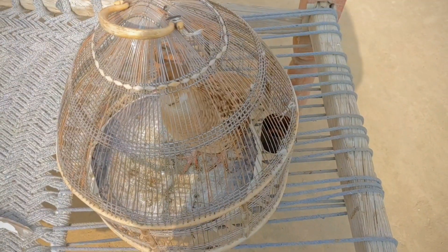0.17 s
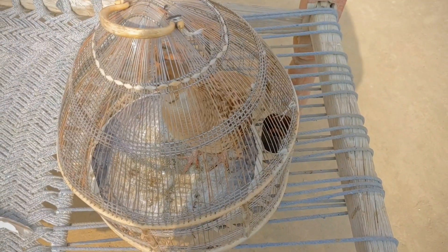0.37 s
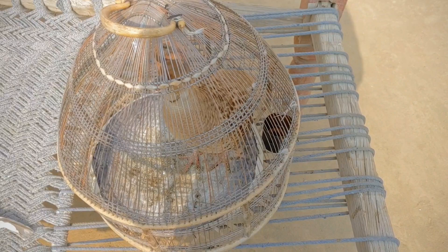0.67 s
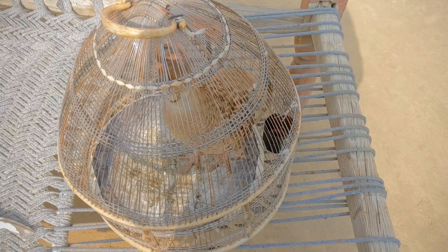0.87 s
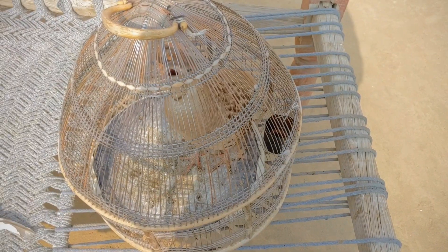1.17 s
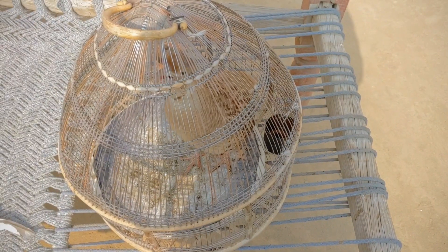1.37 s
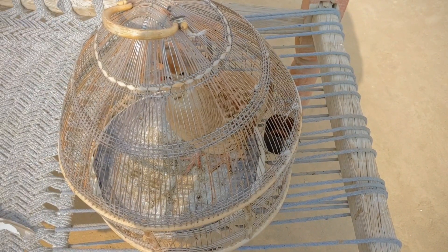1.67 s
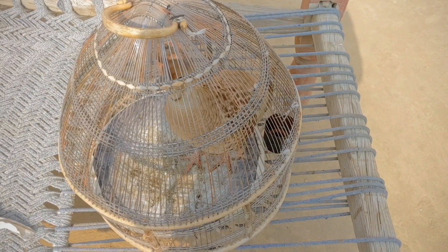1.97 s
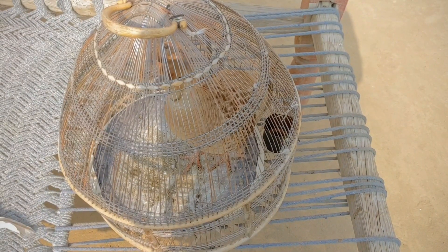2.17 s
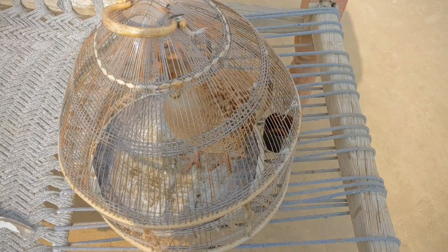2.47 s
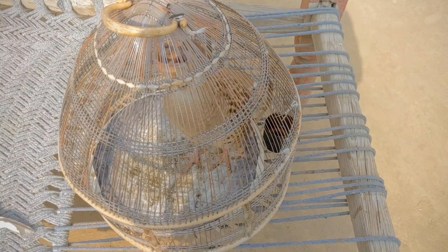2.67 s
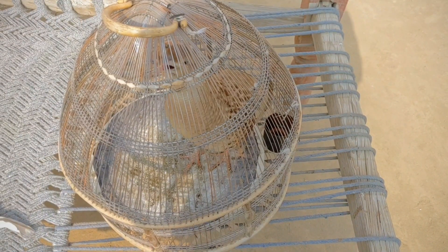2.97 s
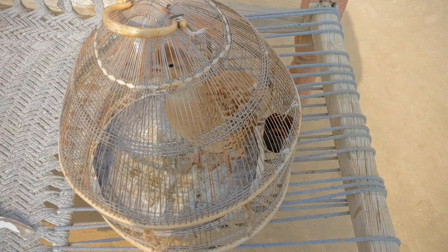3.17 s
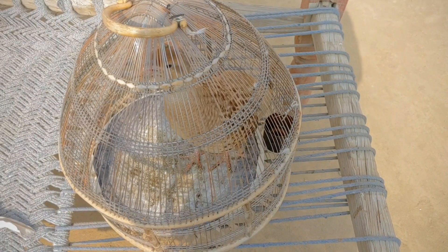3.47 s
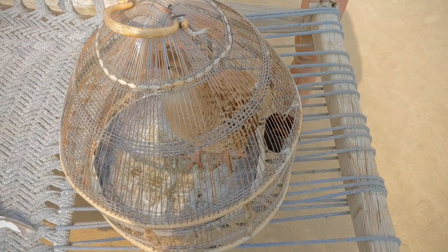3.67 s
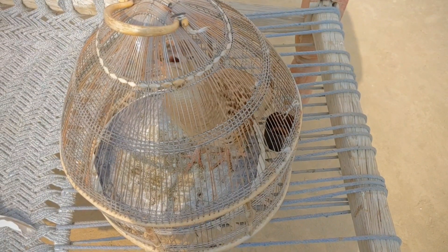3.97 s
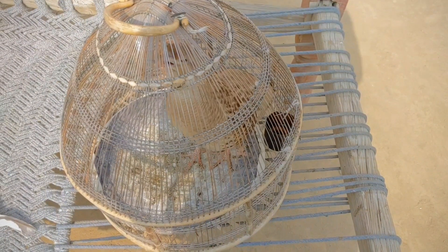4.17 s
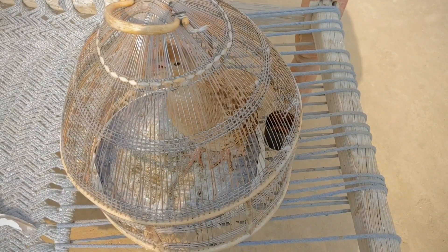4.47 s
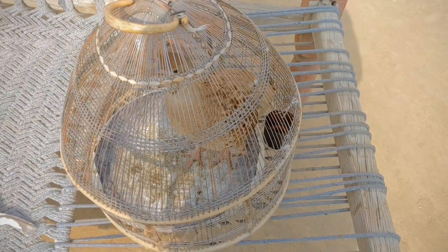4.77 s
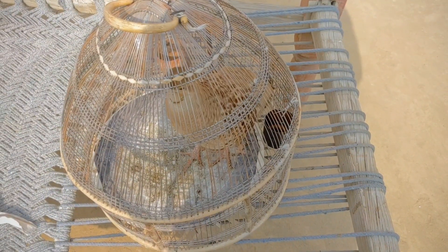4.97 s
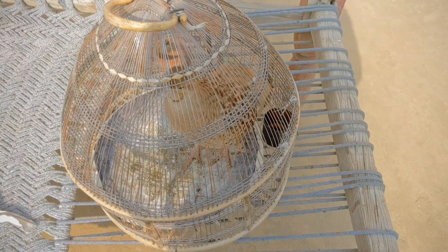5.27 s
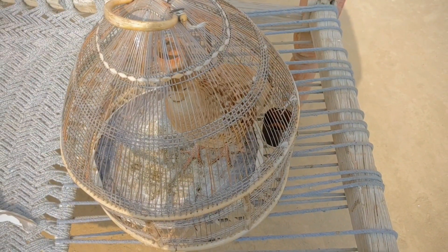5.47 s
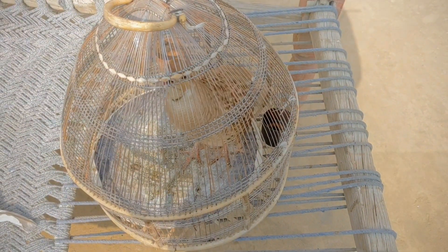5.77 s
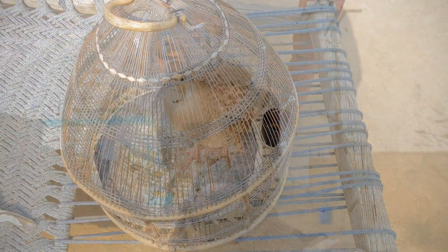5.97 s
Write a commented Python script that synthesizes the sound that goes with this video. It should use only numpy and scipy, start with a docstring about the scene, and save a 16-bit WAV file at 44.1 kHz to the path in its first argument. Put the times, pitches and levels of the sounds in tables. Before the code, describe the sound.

A caged partridge close by calls in harsh yelps and sinking rasping cluck runs, while a second partridge answers with short pure whistles in a quiet yard.

```python
"""A quiet walled yard: a partridge in a wicker cage calls in bouts, close to a camera.
A bout is a two-part call, a yelp and a sinking run of clucks: rough pulse trains pushed through
a throat filter, giving way to clear stacks of harmonics when strong. A second partridge answers with
nearly pure gliding whistles. Soft low gulps and far chirps are sine glides; hisses, a low drone and
the yard's air are filtered noise. A short echo follows both birds."""
import sys
import numpy as np
from scipy import signal
from scipy.fft import rfft, irfft, next_fast_len
from scipy.io import wavfile
from scipy.ndimage import uniform_filter1d, minimum_filter1d

SR = 44100
rng = np.random.default_rng(int(sys.argv[2]) if len(sys.argv) > 2 else 0)


def materialize(psi):
    """Save the field psi as 16-bit PCM at rate SR to the path in sys.argv[1].

    A 1-D psi becomes a single channel; in a 2-D psi each row is a channel.
    """
    bounded = np.clip(np.atleast_2d(psi).T, -1, 1)
    quanta = np.round(bounded * 32767).astype(np.int16)
    wavfile.write(sys.argv[1], SR, quanta)


N = 269715

# colour of the yard's faint background air: (frequency [Hz], relative level [dB])
YARD_COLOUR = [(20, -10.5), (60, -8.5), (110, 1), (150, -0.5), (260, -3), (500, -8), (1300, -6.5),
               (2200, -2), (4000, -15), (8000, -22.5), (15000, -32.5)]
# low drone that comes and goes: (time [s], level [dB])
DRONE_LEVELS = [(0, -66.5), (.45, -56), (.8, -65), (1.2, -73), (2.1, -66.5), (2.4, -67.5), (2.8, -75.5),
                (4.5, -68), (5., -63), (5.35, -66), (5.6, -56), (5.8, -79.5)]
# colour of the drone: (frequency [Hz], relative level [dB])
DRONE_COLOUR = [(70, -31.5), (120, -10), (155, -1), (210, -13), (310, -4), (450, -19.5), (800, -47)]
# how long the yard rings: (frequency [Hz], time to fall by 60 dB [s])
YARD_RING = [(300, .25), (1700, 0.56), (4000, 0.39), (10000, 0.65)]
# colour of the sound that feeds the echo: (frequency [Hz], gain [dB])
ECHO_COLOUR = [(250, -24.5), (900, 3.5), (1400, 4), (2000, 2.5), (2600, 2.5), (5000, -5.5), (12000, -12)]
# chirps of a small bird far off: (start [s], length [s], first pitch [Hz], last pitch [Hz], level [dB])
FAR_CHIRPS = [(1.875, 0.074, 3800, 3480, -49), (2., 0.07, 3470, 3610, -44.5)]
# soft low gulps: (start [s], level [dB])
LOW_GULPS = [(0.911, -46), (1.754, -51.5), (2.442, -46.5), (3.548, -50), (4.555, -46), (5.334, -43.5)]
# airy hisses: (start [s], end [s], level before mixing [dB], extra treble before levelling [dB])
AIRY_HISSES = [(-.06, 0.112, -30, -10), (.45, 0.872, -36, -7), (5.116, 5.62, -34, -8.5)]
# colour of the hissing air: (frequency [Hz], relative level [dB])
HISS_COLOUR = [(500, -46.5), (860, -18), (1150, -30), (1550, -9.5), (1800, 2), (2020, -4.5), (2400, -24),
               (3000, -23), (4150, -15), (4700, -24), (7200, -21), (9300, -28), (10500, -41.5),
               (15000, -46.5)]
# arched whistles, levels as in the left channel:
# (start [s], crest [s], end [s], crest pitch [Hz], level at start [dB], level at end [dB])
ARCHED_WHISTLES = [(0.38, .522, .61, 1665, -13, -16.5), (0.987, 1.135, 1.215, 1753, -11.5, -12),
                   (1.89, 2.03, 2.16, 1768, -18, -27.5), (2.523, 2.664, 2.74, 1750, -13.5, -21),
                   (3.632, 3.782, 3.918, 1755, -18, -16), (4.664, 4.81, 4.946, 1758, -14, -17.5),
                   (5.406, 5.532, 5.665, 1775, -7, -16)]
# how the throat colours the rasp: (frequency [Hz], relative gain [dB])
THROAT_COLOUR = [(50, -62.5), (180, -30.5), (300, -21), (550, -27), (800, -27.5), (1050, -14), (1300, -0.5),
                 (1800, 1), (2200, -9), (2650, -15), (3600, -13.5), (4600, -16.5), (5400, -11),
                 (7600, -30.5), (9500, -26), (14500, -46.5)]
# colour of a clear tone's overtones: (frequency [Hz], relative level [dB])
OVERTONE_COLOUR = [(2600, 0), (3300, -2.5), (4000, 0.5), (4600, -8), (5200, 2.5), (6000, -14), (7000, -13),
                   (8000, -15), (9000, -19.5), (12000, -27), (15000, -30.5)]
# narrow resonances and notches of beak and cage: (centre [Hz], half width [Hz], gain [dB])
CAGE_RESONANCES = [(800, 64, 3), (1455, 96, 1.5), (1475, 67, -3), (1988, 31, 1.5), (2500, 76, -3.5),
                   (2760, 34, 4.5), (3270, 120, 0.5), (3650, 82, 4), (4223, 120, 5), (4840, 140, -2),
                   (5470, 100, 3), (6060, 220, -3), (6880, 270, 3.5), (7590, 330, -5), (7950, 140, 3),
                   (10450, 260, -10.5), (12450, 300, 3), (13800, 500, 2)]
# right channel against the left for the near bird: (frequency [Hz], gain [dB])
RIGHT_SHADE = [(600, -1), (1000, -2), (1250, -3), (1480, -5), (1800, -4.5), (2050, -16.5), (2420, -10.5),
               (2750, -20.5), (4000, -18.5), (6000, -22.5), (7700, -36), (11000, -29), (13500, -2.5)]
# phase of the right channel against the left: (frequency [Hz], lead [radians])
RIGHT_LEAD = [(300, -0.5), (1100, 0.44), (1500, 0.97), (1950, 0.95), (2250, 3.5), (3000, 8), (4000, -6),
              (5800, 5), (8000, 23), (11000, 17), (15000, 28.5)]
# two-part calls, levels before cage and mixing: (start [s], length [s], reference pitch [Hz],
# held for [s], level [dB], pitch it cracks up to [Hz], 0 for no crack)
CALLS = [(1.161, .179, 1988, .052, -10.5, 0), (2.692, .176, 1982, .023, -9.5, 2548),
         (3.933, .173, 1974, .049, -9, 0), (5.681, .171, 1952, .05, -11, 0)]
# pushes within every call: (time after start [s], width [s], level against the call [dB])
PUSHES_IN_CALL = [(0.019, .005, -10.5), (.042, .006, -10.5), (.1, .003, -15), (0.126, .002, -13)]
# a yelp follows each call, levels before cage and mixing: (start [s], rasp pitch [Hz], rasp level [dB],
# tone length [s], tone from [Hz], tone to [Hz], level change over the tone [dB])
YELP_ROWS = [(1.436, 1003, -19, .04, 1773, 1405, -17), (2.962, 996, -19.5, .043, 1784, 1454, -14),
             (4.208, 1013, -19.5, .025, 1925, 1626, -3), (5.956, 1011, -21.5, .033, 1820, 1397, -8.5)]
# runs of clucks that sink in pitch, levels before cage and mixing: (start [s], top pitch [Hz],
# level [dB], treble against the level [dB], break after start [s], break level [dB],
# reference pitch of the tone [Hz], 0 for no tone)
CLUCK_ROWS = [(.059, 958, -15.5, -13, .042, -21, 1343), (.18, 823, -22, -17, .04, -13.5, 1338),
              (.292, 813, -25, -21, .041, -16.5, 0), (.397, 728, -28.5, -19, 0.042, -29, 0),
              (.511, 659.4, -31.5, -20.5, .04, -35, 0), (.621, 506.5, -27.5, -22, .04, -42, 0),
              (.733, 428.3, -31.5, -25, .04, -41, 0), (.88, 296, -48.5, -38, .02, -50.5, 0),
              (1.561, 962, -17, -12.5, .034, -12, 2016.5), (1.676, 958, -16, -16.5, .035, -14, 1998.5),
              (1.792, 921, -19, -16, .034, -16, 1955), (1.908, 793, -21, -16, .04, -14, 1353.5),
              (2.026, 734, -23.5, -18, .048, -25.5, 0), (2.151, 547.4, -23, -21, .04, -35.5, 0),
              (2.297, 277, -43.5, -16, .025, -51.5, 0), (3.091, 976.6, -16.5, -11, .032, -13.5, 2063),
              (3.207, 956, -16.5, -16.5, .034, -9, 1997.5), (3.326, 906, -21.5, -13.5, .034, -13.5, 1960.5),
              (3.447, 831, -23.5, -15.5, .04, -11.5, 1387.5), (3.573, 736, -23.5, -21.5, .048, -21, 0),
              (3.688, 528, -27, -23, 0.048, -36, 0), (4.341, 982.5, -17, -11.5, .033, -16, 2099.5),
              (4.46, 940.5, -16, -14.5, .033, -12.5, 2055), (4.576, 922, -19, -13, .035, -10, 2016.5),
              (4.698, 826, -19.5, -15.5, .042, -13, 1442), (4.83, 727, -22, -16.5, .052, -31, 0),
              (4.956, 462, -27.5, -18, .04, -40.5, 0), (6.08, 1004, -17, -9.5, .034, -14, 2051)]

TIME = np.arange(N) / SR  # s
EDGE_HZ = 15400  # nothing sounds above this
YARD_DB = -63
GULP_S, GULP_FROM_HZ, GULP_TO_HZ = .077, 250, 120
WHISTLE_BEND_HZ_PER_S2 = 6300
HOLD_AT_S, FALL_AT_S, FALL_S, CRACK_S = .052, .123, .05, .021
# start, middle and end of each part, as ratios to the call's reference pitch
HOLD_BEND, FALL_BEND = (1.045, 1.005, 1.02), (1.075, .895, .785)
YELP_S, YELP_BREAK_S = .081, .0265
CLUCK_S, FULL_LENGTH_HZ = .067, 440  # clucks lower than this are shorter in proportion
SMOOTH_HZ, STRAINED_HZ = 477, 750  # strain, and with it roughness, grows between these pitches
# pitch ratios of a cluck's tone in the high and the low register, and where they divide
HIGH_BEND, LOW_BEND, REGISTER_HZ = (1.03, 0.99, .89), (1.09, 1, .94), 1700


def gain_of(db):
    """Turns decibels into amplitude."""
    return 10 ** (np.asarray(db) / 20)


def evened(x):
    """Scales a sound to an average strength (rms) of 1."""
    return x / np.sqrt(np.mean(x ** 2) + 1e-20)


def read(points, hz):
    """Reads a table between its points, on a log-frequency axis."""
    f, value = np.transpose(points)
    return np.interp(np.log(hz + 1), np.log(f + 1), value)


def shaped(x, response):
    """Filters x by a response given as a function of frequency."""
    size = next_fast_len(len(x) + 2048)
    spectrum = rfft(x, size) * response(np.fft.rfftfreq(size, 1 / SR))
    return irfft(spectrum, size)[:len(x)]


def coloured_noise(response):
    """Noise of rms 1, as long as the scene, coloured by a response."""
    return evened(shaped(rng.standard_normal(N), response))


def above(hz, edge_hz):
    """Steep crossover: near 0 below the edge, near 1 above."""
    return 1 - 1 / (1 + (hz / edge_hz) ** 12)


def wander(count, rate_hz):
    """Random unsteadiness of rms about 1, mostly slower than the rate."""
    noise = rng.standard_normal(N // 8)
    return evened(shaped(noise, lambda f: 1 / (1 + (f / rate_hz) ** 4)))[:count]


def gate(t, start, end, edge):
    """1 between start and end, with smooth edges."""
    inside = np.minimum(t - start, end - t)
    return np.sin(np.pi / 2 * np.clip(inside / edge + .5, 0, 1)) ** 2


def push(t, at, width):
    """A brief bell-shaped push of height 1."""
    return np.exp(-.5 * ((t - at) / width) ** 2)


def span(start, end):
    """The samples between two times."""
    return slice(max(round(start * SR), 0), round(end * SR))


def yard_air(apart_db=-9):
    """Faint steady noise; the part that differs between the channels is mostly deep rumble."""
    both = coloured_noise(lambda f: gain_of(read(YARD_COLOUR, f)))
    own = [coloured_noise(lambda f: gain_of(read(YARD_COLOUR, f)) * (1.2 - above(f, 90))) for _ in range(2)]
    return gain_of(YARD_DB) * evened(both + gain_of(apart_db) * np.array(own))


def drone():
    """Low noise whose level comes and goes."""
    noise = coloured_noise(lambda f: gain_of(read(DRONE_COLOUR, f)))
    return noise * gain_of(np.interp(TIME, *np.transpose(DRONE_LEVELS)))


def yard_echo(x, near_db=-13, near_decay_s=0.01, walls_db=-19.0, walls_rise_s=0.013, right_db=-4):
    """Quick scatter from cage and cot, and the thin ring of the yard walls, made of fading random echoes."""
    t = np.arange(SR // 2) / SR
    taps = rng.standard_normal((2, len(t))) * (rng.random((2, len(t))) < .06)  # sparse reflections
    hz, frames, z = signal.stft(taps, SR, nperseg=256)
    fading = z * gain_of(-60 * frames / read(YARD_RING, hz)[:, None])
    walls = signal.istft(fading, SR, nperseg=256)[1][:, :len(t)]
    walls = walls * np.clip(t / walls_rise_s, 0, 1)
    near = rng.standard_normal((2, len(t))) * np.exp(-t / near_decay_s) * (t > .002)
    response = gain_of(near_db) * near / np.linalg.norm(near[0])
    response += gain_of(walls_db) * walls / np.linalg.norm(walls[0])
    sent = shaped(x, lambda f: gain_of(read(ECHO_COLOUR, f)))
    return signal.fftconvolve(sent[None], response, axes=1)[:, :N] * gain_of([[0], [right_db]])


def glides(rows):
    """Soft short sine waves that slide in pitch, swell quickly and fade."""
    out = np.zeros(N)
    for start, length, from_hz, to_hz, db in rows:
        part = span(start, start + length)
        u = np.linspace(0, 1, len(TIME[part]))
        hz = to_hz + (from_hz - to_hz) * (1 - u) ** 2
        swell = abs(np.sin(np.pi * u ** 0.62)) ** 2
        out[part] += gain_of(db) * swell * np.sqrt(2) * np.sin(2 * np.pi * np.cumsum(hz) / SR)
    return out


def far_chirps():
    """A small bird far off: two high sine glides."""
    return glides(FAR_CHIRPS)


def gulps():
    """Soft low gulps: short sine glides that drop in pitch."""
    return glides([(start, GULP_S, GULP_FROM_HZ, GULP_TO_HZ, db) for start, db in LOW_GULPS])


def hisses():
    """Air rushing through a bird's open throat without voice: noise that swells and fades."""
    out = np.zeros(N)
    for start, end, db, treble_db in AIRY_HISSES:
        air = coloured_noise(lambda f: gain_of(read(HISS_COLOUR, f) + treble_db * above(f, 2600)))
        out += gain_of(db) * air * np.sin(np.pi * np.clip((TIME - start) / (end - start), 0, 1)) ** 2
    return out


def whistles(right_db=-13, lead=3.2, second_db=-53, third_db=-70, jitter=0.0032, waver_db=1.24,
             attack_s=.036, release_s=0.042):
    """Nearly pure whistles on a parabola of pitch, from a slightly different direction."""
    out = np.zeros((2, N))
    for start, crest, end, top_hz, from_db, to_db in ARCHED_WHISTLES:
        part = span(start - attack_s, end + release_s)
        t = TIME[part]
        arch_hz = top_hz - WHISTLE_BEND_HZ_PER_S2 * (t - crest) ** 2
        pitch = arch_hz * (1 + jitter * wander(len(t), 120))
        phase = 2 * np.pi * np.cumsum(pitch) / SR + np.array([[0], [lead]])
        db = np.interp(t, [start, end], [from_db, to_db]) + waver_db * wander(len(t), 22)
        fades = gate(t, start, np.inf, attack_s) * gate(t, -np.inf, end, release_s)
        harmonics = np.cos(phase) + gain_of(second_db) * np.cos(2 * phase)
        harmonics += gain_of(third_db) * np.cos(3 * phase)
        out[:, part] += np.sqrt(2) * gain_of(db) * fades * harmonics
    return out * gain_of([[0], [right_db]])


def rasp(t, start, end, top_hz, rough, clean, rest_hz=250, jitter=.2, flutter=0.55, air=0.44, smear=1.199):
    """Uneven pulses on an arch of pitch pass the throat: bass, core and treble, each of steady level."""
    u = np.clip((t - start) / (end - start), 0, 1)
    if end - start < .12:
        arch = abs(np.sin(np.pi * u ** .88))
    else:
        arch = gate(t, start + .004, end - .018, .085)
    low_hz = min(rest_hz, 0.38 * top_hz)
    hz = low_hz + (top_hz - low_hz) * arch
    turns = np.cumsum(hz * (1 + jitter * rough * wander(len(t), 400))) / SR
    k = np.arange(1, int(EDGE_HZ / low_hz))[:, None]  # harmonic numbers
    pulses = evened((np.cos(2 * np.pi * k * turns) * (k * hz < EDGE_HZ)).sum(0) * np.sqrt(hz))
    pulses = pulses * (1 + flutter * rough * wander(len(t), 630))
    # turbulent air, strongest just after each pulse, roughens the treble
    puffs = evened(rng.standard_normal(N // 8)[:len(t)] * (0.22 + np.exp(-(turns % 1) / 0.24)))
    drive = pulses + air * shaped(puffs, lambda f: rough + 2 * above(f, 2700))

    def throat(f):
        """Colours the voice and holds the low part of each pulse back, so pulses ring, not click."""
        return gain_of(read(THROAT_COLOUR, f)) * np.exp(-2j * np.pi * smear * np.log1p(f / 600))

    voice = shaped(drive, throat)
    bass = shaped(voice, lambda f: 1 - above(f, 1177))
    core = shaped(voice, lambda f: above(f, 1129) - above(f, 2505))
    treble = shaped(voice, lambda f: above(f, 2003))
    # the fundamental stays a clean line under the roughness
    bass = evened(bass) + clean * np.sqrt(2) * arch * np.sin(2 * np.pi * np.cumsum(hz) / SR)
    steady = []
    for band in (bass, core, treble):
        power = abs(uniform_filter1d(band ** 2, size=400)) + 0.23 * np.mean(band ** 2)
        steady.append(band / np.sqrt(power))
    return steady, arch


def rough_voice(t, start, end, top_hz, rough, effort, treble_db, bass_db, locked, clean, locked_db=-13,
                locked_treble_db=-10, locked_bass_db=-17, bass_power=0.27):
    """The rasp follows the effort, its bass only a little, and gives way while a clear tone holds."""
    (bass, core, treble), arch = rasp(t, start, end, top_hz, np.clip(rough, 0, 1), clean)
    core_gain = gain_of(locked_db * locked)
    treble_gain = gain_of(treble_db + locked_treble_db * locked)
    voice = effort * (core_gain * core + treble_gain * treble)
    voice += gain_of(bass_db + locked_bass_db * locked) * effort ** bass_power * (1 + arch) * bass
    return voice * gate(t, start + .0015, end, 0.0088)


def tone(t, start, length, pitches, db, fade_db, overtones_db, dulling_db, jitter, fray, tilt_db,
         shimmer=.12, edge=0.0022):
    """The locked voice: harmonics that bend through three pitches and fade late; also gives when it holds."""
    u = np.clip((t - start) / length, 0, 1)
    hz = np.polyval(np.polyfit([0, .5, 1], pitches, 2), u)
    phase = 2 * np.pi * np.cumsum(hz * (1 + jitter * wander(len(t), 250))) / SR
    k = np.arange(2, 9)[:, None]  # harmonic numbers
    frayed = phase + fray * wander(len(t), 780)  # uneven cycles smear the higher harmonics
    strengths = gain_of(read(OVERTONE_COLOUR, k * hz) + tilt_db * k)
    overtones = evened((strengths * np.cos(k * frayed)).sum(0))
    held = gate(t, start, start + length, edge)
    level = gain_of(db + fade_db * u ** 3.7) * held * (1 + shimmer * wander(len(t), 200))
    return level * (np.sqrt(2) * np.cos(phase) + gain_of(overtones_db + dulling_db * u) * overtones), held


def call(t, length, hz, hold_s, db, crack_hz, rasp_ratio=.55, swell_db=-17, gap_db=-3, bass_db=-28.5,
         bass_sag_db_per_s=170):
    """A harsh bright rasp, a held tone that may crack upwards, a catch, then a falling tone."""
    hold, holding = tone(t, HOLD_AT_S, hold_s, hz * np.array(HOLD_BEND), db, fade_db=-7, overtones_db=-4,
                         dulling_db=2.5, jitter=0.0036, fray=.06, tilt_db=0.0)
    fall, falling = tone(t, FALL_AT_S, FALL_S, hz * np.array(FALL_BEND), db, fade_db=-15, overtones_db=-6.5,
                         dulling_db=-8, jitter=.005, fray=0.057, tilt_db=-1.5)
    crack, cracking = 0, 0
    if crack_hz > hz:  # a shriek whose overtones are stronger than its root
        crack, cracking = tone(t, HOLD_AT_S + hold_s, CRACK_S, np.full(3, crack_hz), db - 13.5, fade_db=0,
                               overtones_db=11.5, dulling_db=0, jitter=.003, fray=.04, tilt_db=-4.5)
    effort = gain_of(swell_db + gap_db * gate(t, 0.093, FALL_AT_S, .006))
    effort = effort * gate(t, .007, length - .016, 0.0055)
    effort += sum(gain_of(push_db) * push(t, at, width) for at, width, push_db in PUSHES_IN_CALL)
    bass = bass_db - bass_sag_db_per_s * abs(t - .042)
    rough = rough_voice(t, 0, length, hz * rasp_ratio, rough=.58, effort=gain_of(db) * effort, treble_db=7,
                        bass_db=bass, locked=holding + cracking + falling, clean=1.5)
    return hold + crack + fall + rough


def yelp(t, top_hz, db, tone_s, from_hz, to_hz, fade_db, push_db=3, bass_db=-34, bass_sag_db_per_s=140):
    """One rasping push that breaks into a falling tone."""
    pitches = (from_hz, np.sqrt(from_hz * to_hz), to_hz)
    clear, held = tone(t, YELP_BREAK_S, tone_s, pitches, db=-8.5, fade_db=fade_db, overtones_db=-10.5,
                       dulling_db=-7, jitter=.006, fray=0.047, tilt_db=0.2)
    effort = gate(t, 0.011, YELP_S - .018, 0.012) + 0.05
    effort += gain_of(push_db) * push(t, 0.022, .0052) + 0.075 * push(t, 0.085, 0.0031)
    bass = bass_db - bass_sag_db_per_s * t
    return clear + rough_voice(t, 0, YELP_S, top_hz, rough=.62, effort=gain_of(db) * effort, treble_db=-5.5,
                               bass_db=bass, locked=held, clean=0.35)


def cluck(t, top_hz, db, treble_db, break_s, break_db, tone_hz, push_db=-2, closing_db=-6, catch=.8,
          catch_lead_s=0.0055, tone_s=.016, rest=0.092):
    """A rasping arch. Under strain it pushes, catches and breaks; the strongest lock into a brief tone."""
    length = CLUCK_S * min(1, top_hz / FULL_LENGTH_HZ)
    strain = np.clip((top_hz - SMOOTH_HZ) / (STRAINED_HZ - SMOOTH_HZ), 0, 1)
    swell = gate(t, .014, length - .012, 0.018)
    swell = swell * (1 - min(catch, 1) * strain * push(t, break_s - catch_lead_s, .003))
    effort = gain_of(db) * (swell + rest + strain * gain_of(push_db) * push(t, 0.019, 0.0044))
    effort += gain_of(break_db) * push(t, break_s, .0022 if tone_hz > top_hz else .0038)
    clear, held = 0, 0
    if tone_hz > top_hz:
        # the tone collapses back into rasp
        effort += gain_of(db + closing_db) * push(t, break_s + tone_s, .005)
        bend, overtones_db = (HIGH_BEND, -14) if tone_hz > REGISTER_HZ else (LOW_BEND, -26)
        clear, held = tone(t, break_s + 0.0019, tone_s, tone_hz * np.array(bend), db=-11, fade_db=-6,
                           overtones_db=overtones_db, dulling_db=-4, jitter=.014, fray=0.096, tilt_db=-0.5)
    return clear + rough_voice(t, 0, length, top_hz, rough=.12 + .36 * strain, effort=effort,
                               treble_db=treble_db, bass_db=-36, locked=.6 * held, clean=0.49)


def notes(kind, rows, longest):
    """Plays one kind of note at each row's start."""
    out = np.zeros(N)
    for start, *row in rows:
        part = span(start - .006, start + longest)
        out[part] += kind(TIME[part] - start, *row)
    return out


def cage(x):
    """Narrow resonances and notches of beak and cage colour the caged bird's sounds."""
    def resonances(f):
        return gain_of(sum(db * push(f, hz, width) for hz, width, db in CAGE_RESONANCES))

    return shaped(x, resonances)


def ports(x):
    """The camera body shades the right channel, above all in the treble, and shifts its phase."""
    right = shaped(x, lambda f: gain_of(read(RIGHT_SHADE, f)) * np.exp(1j * read(RIGHT_LEAD, f)))
    return np.array([x, right])


def scene():
    """Both birds, their echoes and the quiet yard."""
    bouts = notes(call, CALLS, .19) + notes(yelp, YELP_ROWS, .088) + notes(cluck, CLUCK_ROWS, .076)
    caller = cage(gain_of(-0.47) * bouts + gain_of(-1.0) * hisses())
    answer = whistles()
    echo = yard_echo(caller + gain_of(-6.0) * answer[0])
    background = yard_air() + drone() + far_chirps()
    return background + gulps() + echo + answer + ports(caller)


def record(dry):
    """A fast limiter holds down the loudest peaks; then a low-pass filter removes the highest treble."""
    allowed = np.minimum(1, .95 / (abs(dry).max(0) + 1e-9))
    limited = dry * uniform_filter1d(minimum_filter1d(allowed, size=121), size=121)
    low_pass = signal.firwin(511, EDGE_HZ, window=("kaiser", 9), fs=SR)
    return signal.oaconvolve(limited, low_pass[None], "same")


dry = scene()
out = record(dry)
materialize(out)
```